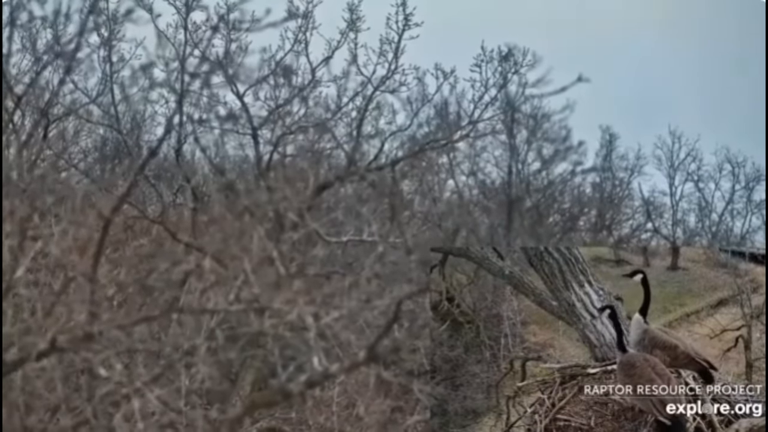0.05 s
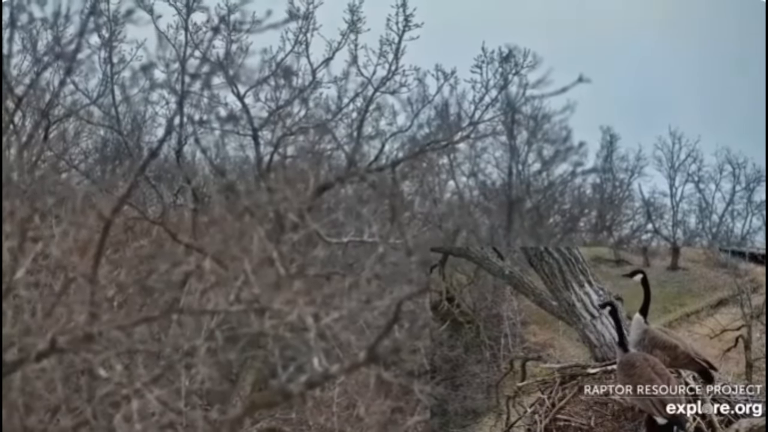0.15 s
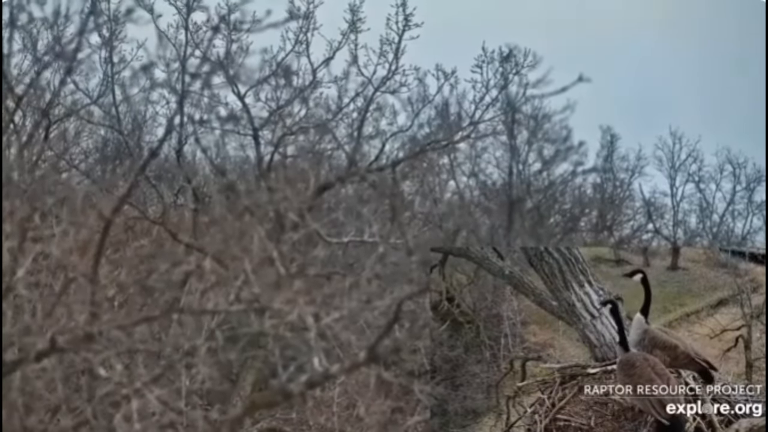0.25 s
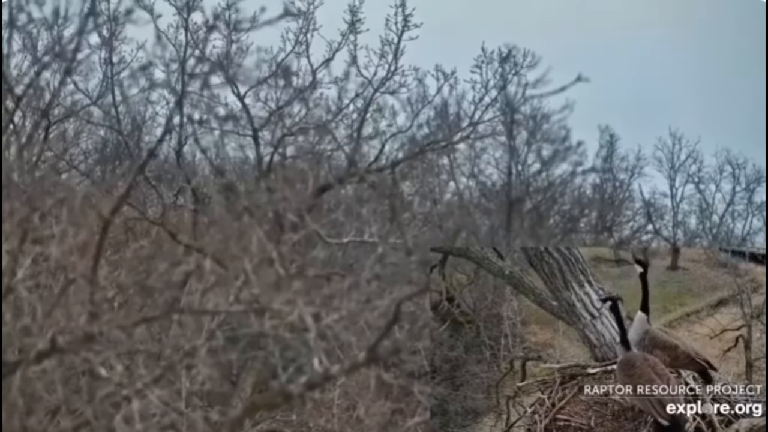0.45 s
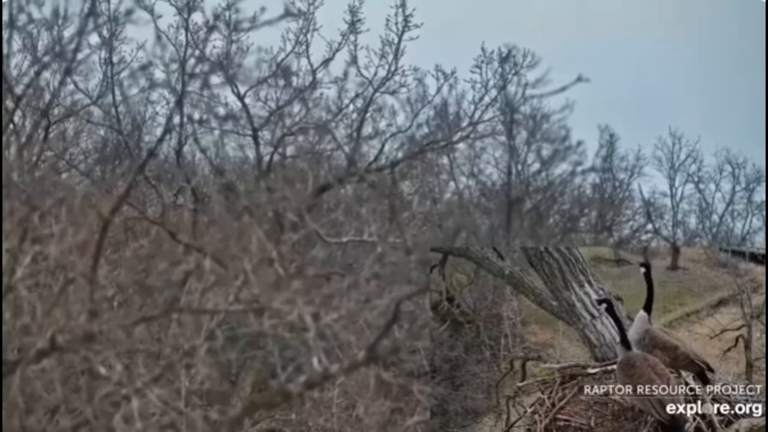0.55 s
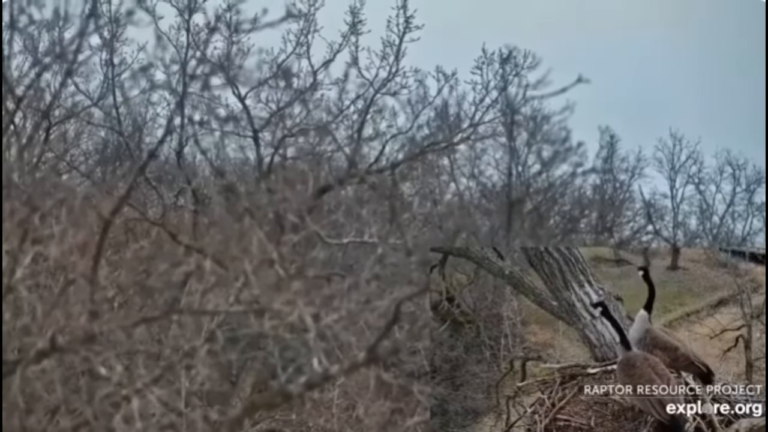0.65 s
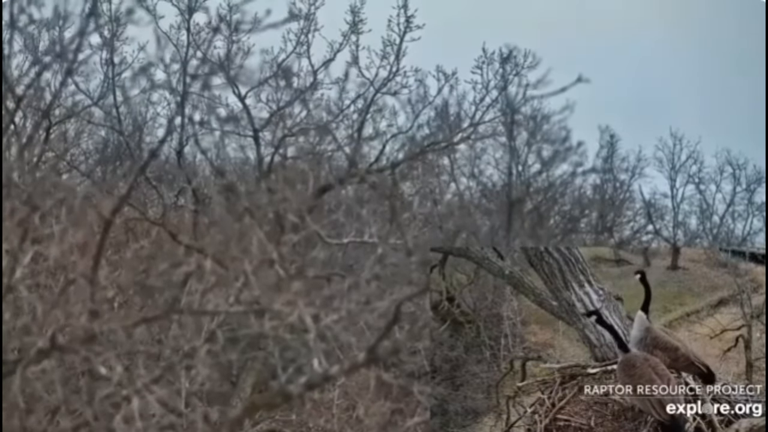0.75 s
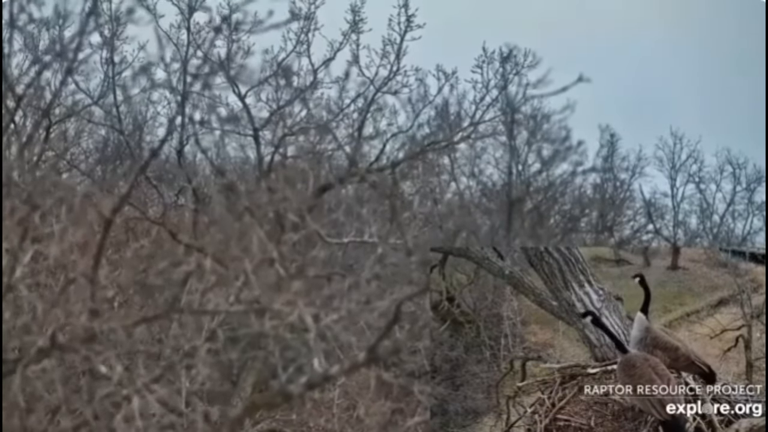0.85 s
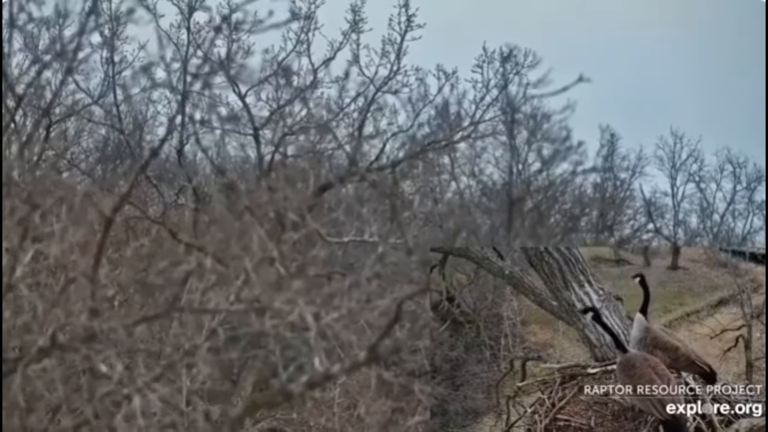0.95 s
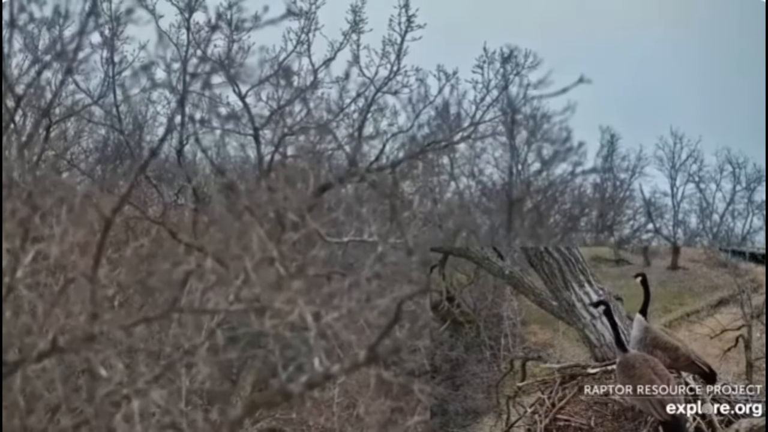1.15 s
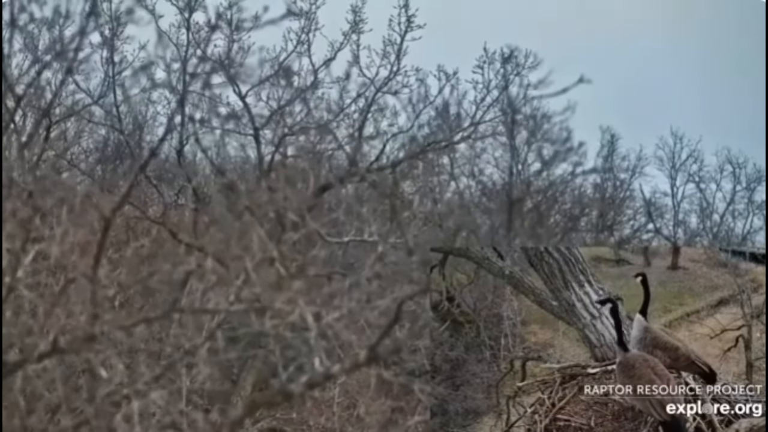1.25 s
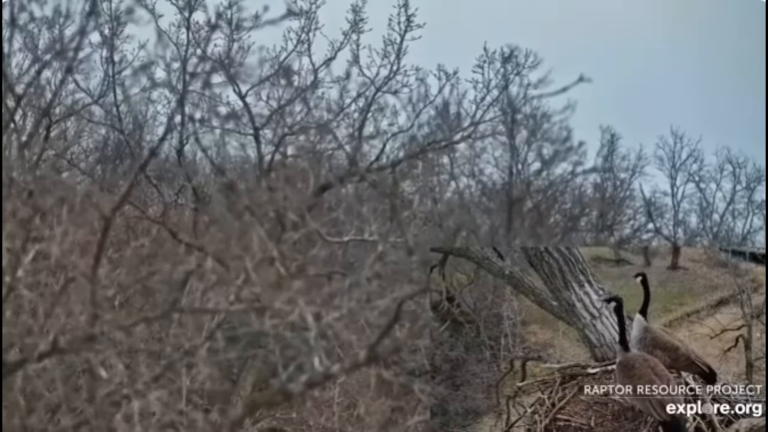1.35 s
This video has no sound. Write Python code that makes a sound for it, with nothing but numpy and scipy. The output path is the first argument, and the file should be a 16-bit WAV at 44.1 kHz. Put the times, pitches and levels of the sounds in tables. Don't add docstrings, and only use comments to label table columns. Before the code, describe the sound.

Two geese calling close by: a short cluck, a rising raspy growl, then three sharp nasal honks overlapping a hoarse bray that cracks into a clear note, with faint outdoor echo and quiet air, slightly overloaded microphone.

```python
import sys
import numpy as np
from scipy import signal
from scipy.fft import rfft, irfft, next_fast_len
from scipy.io import wavfile
from scipy.ndimage import map_coordinates

SR = 44100
rng = np.random.default_rng(int(sys.argv[2]) if len(sys.argv) > 2 else 0)


def boost(x):
    u = np.asarray(x, float) / 20
    return 10 ** u


def digitize_waveform(pressure):
    field = np.atleast_2d(pressure).T
    bounded = np.clip(field, -1, 1)
    quanta = np.round(bounded * 32767).astype(np.int16)
    wavfile.write(sys.argv[1], SR, quanta)


N = 61739


def unit(x):
    return x / np.sqrt(np.mean(x ** 2) + 1e-20)


def along(points, hz):
    f, v = np.transpose(points)
    return np.interp(np.log(hz + 1), np.log(f + 1), v)


def wobble(rate, size=N):
    knots = rng.standard_normal(int(size * rate / SR) + 4)
    return map_coordinates(knots, [np.arange(size) * rate / SR])


def filtered(x, response):
    m = next_fast_len(N + 8192)
    return irfft(rfft(x, m) * response(np.fft.rfftfreq(m, 1 / SR)), m)[:N]


def pipe(peaks):
    def response(f):
        total = 0
        for k, (centre, width, db) in enumerate(peaks):
            resonance = 1j * f * width / (centre * centre - f * f + 1j * f * width)
            total = total + (-1) ** k * boost(db) * resonance
        return total
    return response


# freq_hz, density_db
AIR_SPECTRUM = [(60, -25), (150, -8), (295, -2), (982, -16.5), (1390, -12.5), (1830, -21.5), (3660, -37),
                (15000, -51.5)]
# centre_hz, width_hz, level_db
FAR_BIRDS = [(1350, 680, -68.5), (2880, 590, -73)]
# start_s, length_s, from_hz, to_hz, level_db
CHIRP = (.15, .04, 4400, 3800, -76)
# start_s, pitch_hz, half_length_s, level_db
LATE_BURSTS = [
    (.897, 1290, .004, -44),
    (1.112, 1300, .004, -49),
]


def air():
    t = np.arange(N) / SR
    wind = unit(filtered(rng.standard_normal(N), lambda f: boost(along(AIR_SPECTRUM, f))))
    out = boost(-63 + 0.69 * wobble(8.42)) * wind
    swell_db = 4 * np.cos(2 * np.pi * (t - .05) / 1.15)
    for hz, width, db in FAR_BIRDS:
        band = unit(filtered(rng.standard_normal(N), lambda f: pipe([(hz, width, 0)])(f) ** 2))
        out = out + boost(db + swell_db * (hz > 2000) + 3.5 * wobble(39.8)) * band
    s, length, from_hz, to_hz, db = CHIRP
    progress = np.clip((t - s) / length, 0, 1)
    phase = 2 * np.pi * np.cumsum(from_hz + (to_hz - from_hz) * progress) / SR
    out = out + boost(db) * np.sin(np.pi * progress) * np.sin(phase)
    for s, hz, half, db in LATE_BURSTS:
        envelope = np.exp(-((t - s - half) / half) ** 2)
        out = out + boost(db) * envelope * np.sin(2 * np.pi * hz * t)
    return out


# start_s, end_s
NECK_MOVES_S = (0.34, 0.46)


def neck(x, throat, throat_end):
    top_hz = 7360

    def tube(peaks):
        return unit(filtered(x, lambda f: pipe(peaks)(f) * (top_hz / (top_hz + 1j * f)) ** 6))
    if throat_end is None:
        return tube(throat)
    drawn = np.interp(np.arange(N) / SR, NECK_MOVES_S, [0, 1])
    return (1 - drawn) * tube(throat) + drawn * tube(throat_end)


def beak(growl, growl_db, open_db):
    beak_hz, opens_over_db = 1600, 5
    dull = filtered(growl, lambda f: beak_hz ** 8 / (beak_hz ** 8 + f ** 8))
    shut_db = np.maximum(open_db - growl_db, 0) * 20 / opens_over_db
    return dull + (growl - dull) * boost(-shut_db)


# freq_hz, level_db
BREATH_HISS = [(1500, -13), (3500, -8.5), (7000, -22.5), (8300, -33.5), (10000, -27.5), (15500, -36)]


def voice(rows, throat, reed, open_db=-35, side_db=0, lead=0, throat_end=None):
    jitter, scatter_db = .06, 3.5
    full_db = -24.5
    s, *cols = np.transpose(rows)
    t = np.arange(N) / SR
    growl_hz, reed_hz, growl_db, reed_db, rough = [np.interp(t, s, c) for c in cols]
    rough = np.clip(rough, 0, 1)
    on = np.clip(np.minimum(t - s[0], s[-1] - t) / .006, 0, 1)

    turns = np.cumsum(growl_hz * (1 + jitter * rough * wobble(150))) / SR
    turns = turns - turns[round(s[0] * SR)] + lead
    pulses = np.diff(np.floor(turns), prepend=np.floor(turns[0]))
    pulses = pulses * boost(scatter_db * rough * wobble(200))
    gate = np.exp(-2 * (turns % 1))
    rasp = neck(gate * rng.standard_normal(N), throat, throat_end)
    growl = neck(pulses, throat, throat_end) * np.sqrt(1 - rough) + boost(3) * rough * rasp
    growl = beak(growl, growl_db, open_db)

    phase = 2 * np.pi * np.cumsum(reed_hz * (1 + jitter / 4 * rough * wobble(200))) / SR
    fade = boost(1.8 * np.minimum(reed_db - full_db, 0))
    note = 0
    for k, *dbs in reed:
        overtone_fade = fade ** (k / 2) if k > 1.5 else 1
        for step, db in zip((0, -1, -2, 1), dbs):
            if db > -35:
                level = boost(db + side_db * (step != 0) + scatter_db * rough * wobble(150))
                note = note + level * np.sin(round(k) * phase + step * 2 * np.pi * turns) * overtone_fade

    effort = boost(growl_db) + boost(reed_db) * fade
    breath = (gate + 1.6) * rng.standard_normal(N)
    hiss = unit(filtered(breath, lambda f: boost(along(BREATH_HISS, f))))
    hiss = boost(-15) * hiss * effort * (effort / boost(full_db)) ** (2.1 - 1)
    return on * (boost(growl_db) * growl + boost(reed_db) * note + hiss)


# start_s, growl_hz, reed_hz, growl_db, reed_db, roughness
CLUCK = [
    (.172, 134, 600, -60, -100, 0.14),
    (.19, 139.5, 600, -40.5, -67, 0.15),
    (.215, 147.7, 600, -32.5, -41, .08),
    (.231, 150, 626, -33.5, -43, 0.2),
    (.243, 160, 608, -37, -27, 0.25),
    (.251, 203.2, 600, -28, -41, 0.28),
    (.262, 201.5, 556, -34.5, -61, 0.2),
    (.277, 210, 550, -50, -67, 0.2),
    (.29, 181, 595, -100, -78, 0),
]
# start_s, growl_hz, reed_hz, growl_db, reed_db, roughness
YELP = [
    (.247, 190, 632, -90, -32, .4),
    (.253, 190, 632, -83, -27, .4),
    (.259, 197.4, 612, -92, -26.5, .3),
    (.274, 199, 590, -90, -31, .1),
    (.288, 200, 575, -90, -42, 0.076),
]
# centre_hz, width_hz, level_db
GOOSE_PIPE = [(258, 56, -3), (452, 64, -1.5), (600, 43, -7.5), (1192, 114, 2), (2410, 190, -11.5),
              (3020, 490, -15), (3920, 2500, -28.5)]
# multiple, line_db, one_below_db, two_below_db, one_above_db (growl steps)
HUM_REED = [(1, -2, -25, -40, -16), (2, -11, -14, -30, -10), (3, -6, 1, -7, -14)]
# multiple, line_db, one_below_db, two_below_db, one_above_db (growl steps)
NOTE_REED = [(1, -25, -50, -50, -50), (2, 0, -26, -40, -26), (3, -17, -40, -40, -40),
             (4, -26, -40, -40, -40), (5, -15, -28, -40, -40), (6, -8, -20, -40, -20),
             (7, -18, -40, -40, -40), (10, -21, -40, -40, -40)]


def goose_cluck():
    cluck = voice(CLUCK, GOOSE_PIPE, HUM_REED[:1], open_db=-34.5, lead=0.68)
    return cluck + voice(YELP, GOOSE_PIPE, NOTE_REED)


# freq_hz, t60_s
HILL_T60 = [(300, 0.55), (1300, 1), (4000, 0.78), (9000, 0.22)]
# freq_hz, level_db
HILL_COLOUR = [(200, -5), (600, 4), (850, -9), (1300, 1.5), (1750, -18), (2200, 0.5), (3000, -26),
               (4200, -2), (6000, -16), (15000, -37)]


def hill(x):
    hz, t, z = signal.stft(rng.standard_normal(SR), SR, nperseg=256)
    decay_db = -60 * t / along(HILL_T60, hz)[:, None]
    colour_db = along(HILL_COLOUR, hz)[:, None]
    tail = signal.istft(z * boost(decay_db + colour_db), SR, nperseg=256)[1][:SR]
    slope_db = 5 * np.exp(-((np.arange(SR) / SR - .15) / .03) ** 2)
    tail = tail * boost(2 * wobble(41.2, size=SR) + slope_db)
    delayed = np.pad(x, (round(.02 * SR), 0))
    return boost(-32.5) * signal.fftconvolve(delayed, tail / np.linalg.norm(tail))[:N]


# centre_hz, width_hz, level_db
TRUNK = [(1260, 115, -15), (610, 120, -17)]


def trunk(x):
    delay_s = 0.029
    return filtered(x, lambda f: pipe(TRUNK)(f) * np.exp(-2j * np.pi * f * delay_s))


# start_s, growl_hz, reed_hz, growl_db, reed_db, roughness
GROWL = [
    (.275, 106.5, 321, -34, -60, 0.03),
    (.292, 109.7, 328, -53.5, -55, .06),
    (.312, 113.7, 342, -44.5, -51, 0),
    (.332, 117.7, 356, -40, -46, .2),
    (.37, 128.5, 385, -38.5, -43, .25),
    (.4, 141.1, 423, -45, -44, .15),
    (.412, 149.4, 450, -37, -44, .35),
    (.44, 151.8, 480, -30.5, -46, 0.5),
    (.5, 150, 480, -38.5, -80, 0.54),
]
# centre_hz, width_hz, level_db
GROWL_PIPE = [(212, 140, -9), (330, 76, 1.5), (600, 100, -6.5), (1040, 260, -11.5), (1690, 180, -17),
              (2820, 720, -17), (3680, 85, -5), (4770, 640, -13.5)]
# centre_hz, width_hz, level_db
GROWL_PIPE_END = [(300, 110, -12), (480, 63, 1.5), (622, 103, -1.5), (1184, 207, 2), (1647, 130, -6.5),
                  (2520, 620, -9.5), (3530, 56, -1.5), (4670, 890, -14.5)]


def gander_growl():
    return voice(GROWL, GROWL_PIPE, HUM_REED, open_db=-40.5, throat_end=GROWL_PIPE_END)


# start_s (from onset), growl_hz, reed_hz, growl_db, reed_db, roughness
HONK_SHAPE = [
    (0, 140.6, 700.2, -25.5, -64, .08),
    (0.019, 141.9, 704.5, -10, -47, 0.19),
    (.031, 148.2, 706.5, -2.5, -23, 0.11),
    (.04, 166, 697, -13, -1, 0.25),
    (.066, 182.2, 653.8, -18, 1, .12),
    (.088, 186.7, 618, -5, -3, 0.31),
    (.097, 190, 598, -18, -4.5, .1),
    (0.112, 197.5, 573, -54, -9.5, 0.17),
    (0.122, 190, 580, -82, -50, .05),
]
# start_s, level_db, stretch_ratio, sidebands_db
HONKS = [
    (.423, -25, 0.94, -2.5),
    (.644, -23.5, .95, -6.5),
    (.92, -25, 0.98, -1),
]
SWALLOWED_S = (0, .045, 0)
# centre_hz, width_hz, level_db
HONK_PIPE = [(285, 29, -10.5), (451, 49, -4.5), (600, 56, -11.5), (1215, 134, 2), (2300, 240, -13.5),
             (3120, 710, -18), (3860, 1500, -32)]
# multiple, line_db, one_below_db, two_below_db, one_above_db (growl steps)
GOOSE_REED = [(1, -10, -20, -32, -24), (2, 0, -3, -20, -12), (3, -17, -13, -24, -20),
              (4, -23, -19, -20, -24), (5, -17, -9, -13, -18), (6, -15, -10, -14, -19),
              (7, -20, -16, -22, -40)]


def goose_honks():
    t = np.arange(N) / SR
    out = np.zeros(N)
    for (s, db, stretch, side_db), swallowed in zip(HONKS, SWALLOWED_S):
        rows = [(s + start * stretch, growl_hz, reed_hz, growl_db + db, reed_db + db, rough)
                for start, growl_hz, reed_hz, growl_db, reed_db, rough in HONK_SHAPE]
        opening = np.clip((t - s - swallowed) / .004, 0, 1)
        out = out + opening * voice(rows, HONK_PIPE, GOOSE_REED, side_db=side_db, lead=.37)
    return out


# start_s, growl_hz, reed_hz, growl_db, reed_db, roughness
BRAY = [
    (.495, 150, 438.9, -28, -75, 0.53),
    (.515, 148.2, 424.8, -31, -27, 0.55),
    (.535, 139.9, 425.4, -28.5, -31.5, 0.7),
    (.556, 146.5, 419.8, -27.5, -28.5, 0.47),
    (.58, 143.1, 434, -27.5, -31, .45),
    (.602, 135.1, 438, -29, -30.5, 0.68),
    (.63, 139.3, 446, -26, -37.5, 0.69),
    (.648, 150, 458, -35.5, -36.5, 0.33),
    (.66, 150, 460, -73, -62, .2),
]
# start_s, growl_hz, reed_hz, growl_db, reed_db, roughness
TOP_NOTE = [
    (.595, 141, 595.5, -86, -23, 0.33),
    (.62, 143.5, 600, -80, -28, 0.5),
    (.645, 139.4, 624.4, -78, -26, .3),
    (.658, 157, 615, -62, -22, 0.046),
    (.675, 147, 603, -67, -25.5, 0.069),
    (.689, 149, 583, -77, -21, 0.074),
    (.697, 142, 564, -85, -35, .05),
]
# centre_hz, width_hz, level_db
GANDER_PIPE = [(272, 120, -19), (547, 51, -10), (1144, 120, 0), (1836, 280, -11), (2495, 470, -12),
               (3450, 650, -13.5), (4900, 1600, -22.5)]


def gander_bray():
    return voice(BRAY, GANDER_PIPE, HUM_REED) + voice(TOP_NOTE, GANDER_PIPE, NOTE_REED)


def scene():
    birds = goose_cluck() + gander_growl() + goose_honks() + gander_bray()
    return (air() + birds + hill(birds) + trunk(birds))[None]


def top_cut(x):
    return signal.sosfilt(signal.butter(12, 15710, fs=SR, output="sos"), x)


def record(dry):
    low_cut_hz, rumble_hz = 122.4, 150
    clip, hardness = .1, 2.7
    x = filtered(dry[0], lambda f: (1j * f / (1j * f + low_cut_hz)) ** 4)
    x = x / (1 + np.abs(x / clip) ** hardness) ** (1 / hardness)
    x = filtered(x, lambda f: f ** 7 / (f ** 7 + rumble_hz ** 7))
    return top_cut(x[None])


dry = scene()
out = record(dry)
digitize_waveform(out)
```